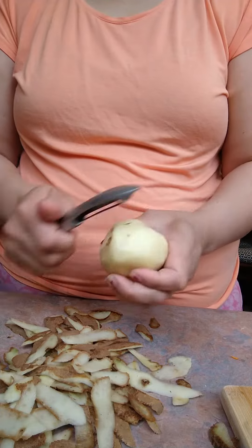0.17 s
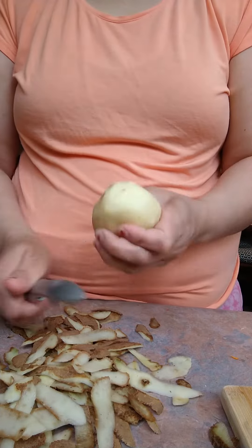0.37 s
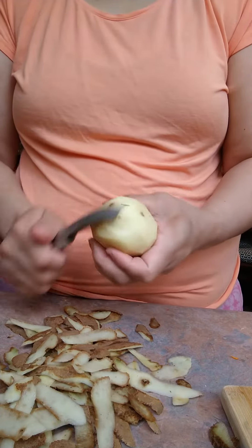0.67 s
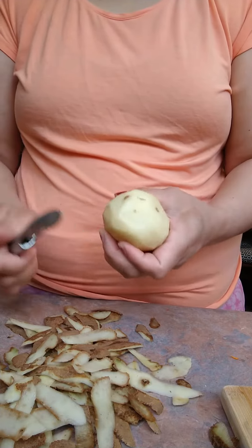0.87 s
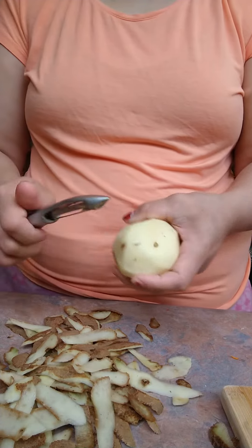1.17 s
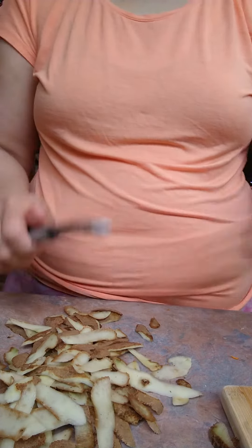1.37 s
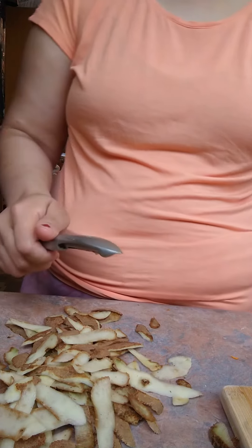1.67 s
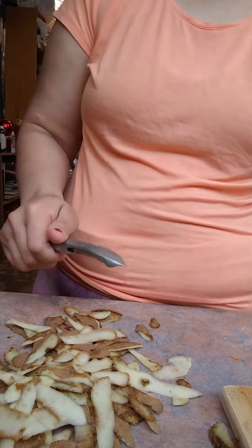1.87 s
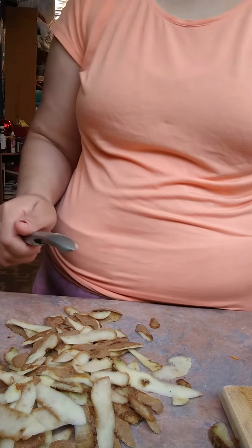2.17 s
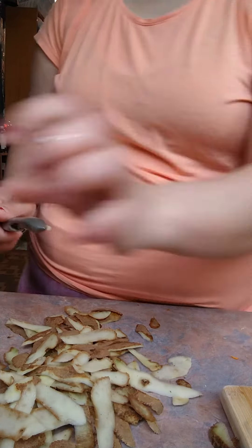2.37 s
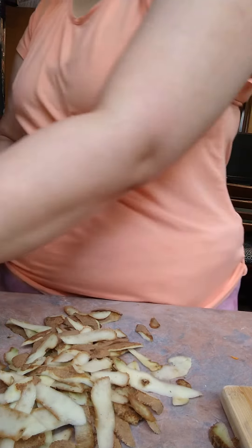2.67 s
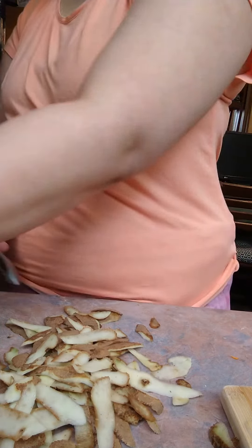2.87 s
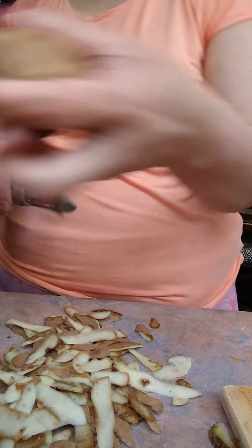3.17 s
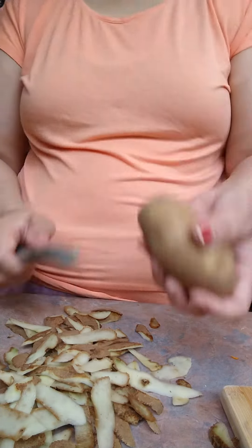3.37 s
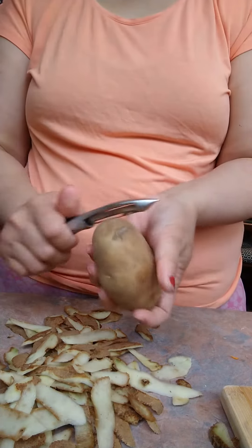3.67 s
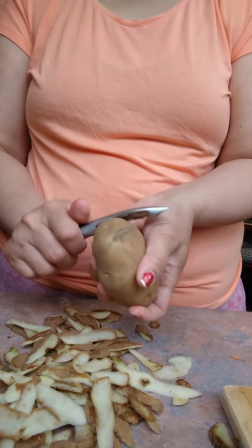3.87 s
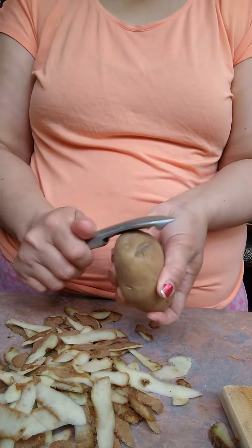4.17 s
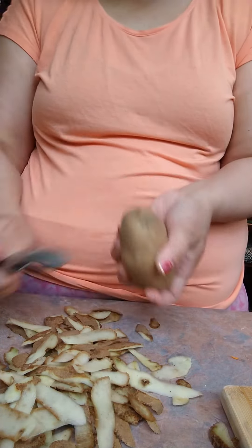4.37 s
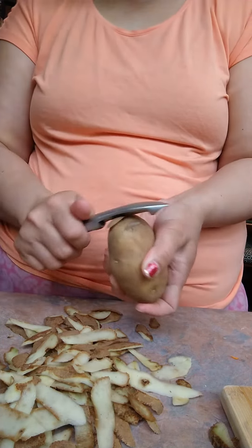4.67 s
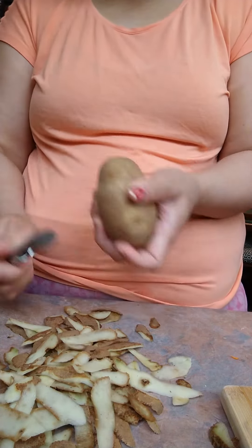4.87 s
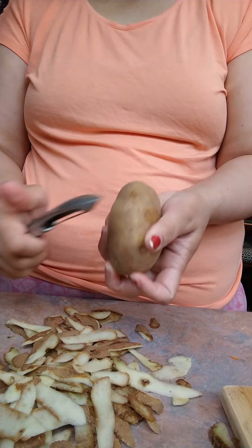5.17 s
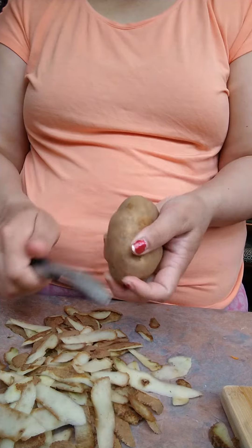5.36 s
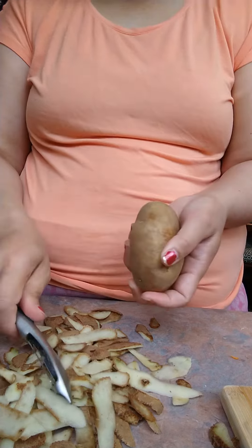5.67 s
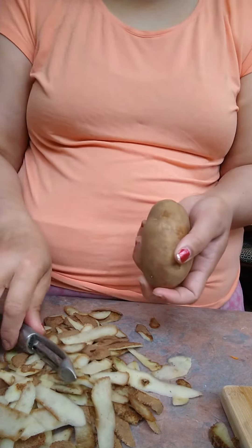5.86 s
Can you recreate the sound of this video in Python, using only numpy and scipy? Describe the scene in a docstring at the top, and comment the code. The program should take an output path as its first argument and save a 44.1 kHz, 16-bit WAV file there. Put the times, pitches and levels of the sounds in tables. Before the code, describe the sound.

A quiet room with soft low rumble, heard closely in stereo. From 0 to 0.85 s, a steel swivel peeler makes quick dry-bright scrapes on a raw potato, with crisp cracks at about 0.35 and 0.72 s and short tearing hiss. From 0.95 to 1.65 s the loose blade ticks and rattles lightly. At 2.1-2.4 s a hollow container booms in a cluster of dull thumps, with a brief low groan and a burst of rubbing; fainter rustling and sleeve movement continue, with a small knock at 2.73 s. Blade rattles at 3.3-3.5 s, then a sharp metallic bite near 3.87 s and scratchy strokes at 4.3, 4.7 and 4.85 s, with soft hand pats. Faint finger rubs follow around 5 and 5.7 s. At 5.94 s the peeler strikes the table loudly, bouncing three more times ever quicker and softer within 0.07 s, wood-like and briefly ringing, toward the left.

```python
"""A swivel peeler takes quick short strokes off a raw potato: random stick and slip drive its damped steel modes,
each bite is a burst of cracks, and skin tears in grains; off the potato the loose blade rattles and taps.
A hollow container booms, groans and rustles as the next potato is fetched, by blows on modes and friction grains.
Fingers, hands and sleeves are filtered grains and pats; at the end the peeler drops and bounces on the table,
whose modes ring. Shaped noise makes the soft room rumble."""
import sys
import numpy as np
from scipy import signal
from scipy.fft import rfft, irfft
from scipy.io import wavfile
from scipy.ndimage import uniform_filter1d

SR = 44100
rng = np.random.default_rng(int(sys.argv[2]) if len(sys.argv) > 2 else 0)


def to_wav(sig):
    """Store sig (one row per channel, or 1-D mono) as 16-bit WAV at the path in sys.argv[1].

    Samples outside -1..1 are clipped; the rate is SR.
    """
    pcm = np.clip(np.atleast_2d(sig), -1, 1) * 32767
    pcm = np.round(pcm).astype(np.int16)
    wavfile.write(sys.argv[1], SR, pcm.T)  # frames by channels


N = 265025
TIME = np.arange(N) / SR
SPAN = SR // 2  # samples given to one event
STEEL_SPAN = SPAN // 4  # samples of the blade's response
BLOW_S = 1 / 200  # a blow's level is its energy spread over this time

# Levels are relative, ahead of panning, filtering and mixing gains.
# blade pressed on the potato, juddering and squealing: (t/s, length/s, level/dB, squeal/dB)
SCRAPES = [(.007, 0.048, -44.5, -8), (0.176, 0.018, -57, -3), (0.411, 0.02, -47, -1.5),
           (.505, 0.0065, -60, 6), (0.711, 0.04, -52.5, 5), (0.799, 0.025, -50.5, -1),
           (4.316, 0.04, -50, 1), (4.389, .007, -45, 3), (4.83, 0.038, -39.5, 5)]
# blade off the potato, rattling in its handle: (t/s, length/s, level/dB)
RATTLES = [(1.133, 0.0086, -60.5), (1.322, 0.018, -51), (1.35, 0.01, -54), (1.3783, 0.0072, -49),
           (1.467, 0.034, -71), (1.508, 0.02, -67), (1.587, 0.017, -66), (3.327, 0.012, -56),
           (3.365, 0.027, -47.5), (3.533, 0.063, -69.5), (3.868, 0.011, -39.5), (4.678, .013, -41.5)]
# loose blade tapping its stops: (t/s, peak level/dB)
TAPS = [(.9616, -52), (1.0742, -56.5), (1.101, -57.5), (1.1565, -46.5), (1.1712, -52), (1.4932, -45.5),
        (1.6186, -41), (3.316, -46.5), (3.7673, -44.5)]
# edge snapping through skin: (t/s, level/dB)
BITES = [(0.34, -38), (0.7212, -36), (3.8722, -43.5), (4.296, -48.5), (4.4193, -52), (4.835, -48.5),
         (4.896, -69)]
# blade sliding under the skin: (t/s, length/s, level/dB, skew: under 1 peaks early, over 1 late)
SLICES = [(.344, 0.082, -59, 0.47), (.725, 0.13, -56, 0.23), (3.79, 0.086, -67.5, 0.73),
          (3.88, .06, -81, 0.21), (4.25, 0.08, -53.5, 1), (4.743, 0.089, -54.5, 1.26),
          (4.871, 0.41, -67, 0.12)]
# steel blade against the potato; t60 ahead of any wet damping: (f/Hz, level/dB, t60/s)
BLADE_MODES = [(1860, -18.5, 0.09), (2200, -22, 0.15), (4090, -21, 0.084), (5760, 2, 0.25),
               (7600, 1, 0.046), (7840, 6, 0.11), (7900, 3, 0.18), (9150, 3.5, 0.77), (10290, 10.5, 0.093),
               (11380, 0.5, 0.48), (11680, -15, 0.09), (11800, -22, 0.12), (12700, -6, 0.061)]
# blade swinging free in its handle, ahead of wet damping: (f/Hz, level/dB, t60/s)
LOOSE_MODES = [(4335, -3, 0.072), (4677, 5, 0.15), (4744, 10.5, 0.035), (4750, -32.5, 0.055)]
# blade squealing as it sticks in the flesh, ahead of wet damping: (f/Hz, level/dB, t60/s)
SQUEAL_MODES = [(4337, -10, 0.037), (5425, -17, 0.3), (10230, -7.5, 0.39), (15300, -1, 0.086),
                (15600, -23, 0.063)]
# potato in the hand: (f/Hz, level/dB, t60/s)
POTATO_MODES = [(320, -4, 0.074), (630, -4.5, 0.0033), (842, 6.5, 0.04), (1300, -42, 0.016),
                (2080, 0, 0.015)]
# spectra of contact grit, tearing skin and the bite's crack: (f/Hz, level/dB)
GRIT_COLOUR = [(500, -82), (1400, -31.5), (2100, 0), (3300, -7), (4300, 9), (6300, -4.5), (8000, 12.5),
               (9500, 0.5), (11000, 11.5), (13500, 1), (16000, -7.5)]
SKIN_COLOUR = [(300, -65), (800, 3.5), (1500, -12.5), (3000, 1), (4500, -2.5), (6000, -1.5), (8000, 2),
               (11000, -3.5), (16000, -4)]
SNAP_COLOUR = [(250, -39), (600, -1), (1500, -5), (2600, 1), (3400, 2), (4600, 4.5), (6200, -4.5),
               (8200, 5), (9700, -0.5), (11500, 7.5), (16000, -4)]
# blows on the container: (t/s, level/dB, contact time/s)
BUMPS = [(2.126, -34.5, 0.0045), (2.183, -30.5, 0.0028), (2.2006, -42, 0.001), (2.229, -36, 0.002)]
# container body: (f/Hz, level/dB, t60/s)
HOLLOW_MODES = [(138.4, -1.5, 0.19), (212, -1, 0.083), (257.5, 7, 0.49), (304.8, 3, 0.31), (435, -2, 0.32),
                (500, 4, 0.52), (993.5, -2, 0.29)]
# container dragging and groaning: (t/s, length/s, level/dB)
DRAGS = [(2.195, 0.22, -37.5), (2.43, 0.18, -51)]
# hand rummaging among the contents: (t/s, length/s, level/dB)
RUMMAGES = [(2.12, 0.14, -58), (2.26, 0.11, -60), (2.35, 0.061, -62), (2.4, 0.6, -68), (2.9, 0.82, -76.5)]
# things rubbing in the container: (f/Hz, level/dB)
RUMMAGE_COLOUR = [(200, -11.5), (470, -2.5), (720, -10), (1000, -6.5), (1300, -17), (1900, -18),
                  (2400, -7.5), (2750, -12.5), (3300, -17.5), (6000, -16), (8000, -31), (14000, -33),
                  (16000, -52)]
# container's rim, rung by the rubbing: (f/Hz, level/dB, t60/s)
RIM_MODES = [(2420, 5, 0.092), (2540, 4, 0.11), (2730, 7, 0.068), (5800, -27, 0.034)]
# a potato knocking on its neighbours: (t/s, level/dB)
NUDGES = [(2.717, -60), (2.7348, -46.5), (3.276, -65.5)]
# spectrum of those knocks: (f/Hz, level/dB)
NUDGE_COLOUR = [(80, 1), (240, 21), (450, 0), (900, 8.5), (1600, -12), (2600, 2), (5000, -9), (14000, -38)]
# peeler bouncing on the table: (t/s, level/dB, contact's low-pass corner f/Hz)
BOUNCES = [(5.938, -16.5, 6800), (5.9747, -19.5, 2730), (5.9944, -22.5, 1620), (6.0057, -28.5, 1750)]
# spectrum of the direct clack: (f/Hz, level/dB)
KNOCK_COLOUR = [(40, -60), (200, -20.5), (400, -6), (700, -1.5), (1100, 3), (1600, -7), (2200, -8),
                (3400, -21), (4800, -24), (6200, -30.5), (11000, -40.5), (16000, -42)]
# hollow handle: (f/Hz, level/dB, t60/s)
HANDLE_MODES = [(1210, -27, 0.07), (1670, 10, 0.019), (2730, -9, 0.0067), (4700, -8, 0.0069)]
# table top: (f/Hz, level/dB, t60/s)
TABLE_MODES = [(113, -13, 0.7), (162.5, -6, 0.14), (310, -3, 0.13), (463.4, -1.5, 0.56), (523, 3, 0.4),
               (728, 6, 0.085), (880, -8, 0.1), (865, -4, 0.088), (1000, -27, .14), (1190, -22, 0.077),
               (1666, 1, 0.038), (2100, -19, .14), (2470, -7.5, 0.32)]
# fingers rubbing over the potato: (t/s, length/s, level/dB, band centre f/Hz)
RUBS = [(2.794, 0.024, -66.5, 11500), (2.848, 0.039, -71.5, 10800), (2.915, 0.044, -66.5, 4800),
        (2.972, 0.059, -66, 7850), (4.005, 0.029, -60, 3300), (4.952, 0.22, -76, 4250),
        (5.064, 0.13, -70.5, 7940), (5.678, 0.068, -69, 4040)]
# fingers shifting the potato: (t/s, level/dB)
PATS = [(3.274, -55), (3.414, -57.5), (3.591, -58), (3.691, -59.5), (3.89, -59), (4.032, -62.5),
        (4.563, -65)]
# soft thud of the hand: (f/Hz, level/dB, t60/s)
PALM_MODES = [(258.7, 2.5, 0.28), (311, 2.5, 0.38), (511, -12.5, 0.3)]
# arms reaching and coming back, sleeves rustling: (t/s, length/s, level/dB)
REACHES = [(2.35, 0.83, -66), (3.05, 0.9, -71), (4.15, 0.99, -74)]
# spectrum of arms and cloth: (f/Hz, level/dB)
CLOTH_COLOUR = [(80, -12.5), (180, 1.0), (300, -4), (600, -37), (1500, -26.0), (5000, -27.5), (12000, -53.5)]
# spectrum of the wall reflections: (f/Hz, level/dB)
WALL_COLOUR = [(100, -6), (1000, 3.5), (5000, -1.0), (16000, -11.5)]
# spectrum of the room's background: (f/Hz, level/dB)
ROOM_COLOUR = [(15, -62.5), (25, -30), (97, 0), (180, -15), (242, -17.5), (301, -25.5), (354, -19.5),
               (384, -31), (516, -27), (818, -32), (1260, -33), (1940, -38.5), (2910, -40), (3250, -40),
               (16000, -49.5)]

# left minus right (dB)
SCRAPE_PAN_DB, RATTLE_PAN_DB, TAP_PAN_DB, BITE_PAN_DB = 2.5, .5, 3.5, 5
PRESSED_LOOSE_DB = -24  # pressure holds the swivel nearly still
FREE_SQUEAL_DB = -13
# gentler rattles ring more beside their grit: the loose modes' gain is 0 dB at this level
RATTLE_EVEN_DB, RING_DB_PER_DB = -50, 0.435
TAP_LOOSE_DB, TAP_DECAY_S = 1, 0.0017
# softer bites have more of the potato's body: its gain beside the crack is 0 dB at this level
BITE_EVEN_DB, BODY_DB_PER_DB = -63.5, 0.8
WET_DAMP_S = 0.035  # wet peel on the blade stops its ring within about this time
BEND_SHARE, BEND_RATE_HZ = 0.0074, 500  # the blade flexes, so its pitch wavers
# whistle of a scrape: gain at 0 dB squeal, and its change per dB of squeal (a stronger squeal has less)
WHISTLE_HZ, WHISTLE_DB, WHISTLE_DB_PER_DB = 15400, -16, -1
GROAN_HZ = 192
# the container's contents tumble at once, then settle
TUMBLE_S, TUMBLE_DB = 2.157, -40.5
TUMBLE_ATTACK_S, TUMBLE_HOLD_S, SETTLE_DB_PER_S = 0.011, 0.018, 300
RUMMAGE_SKEW, DRAG_SKEW, REACH_SKEW = 0.65, 0.61, 0.73
ROOM_DB, TOP_HZ = -63, 16000


def peeler():
    """Friction and fracture: stick and slip shake the blade, skin tears in grains, the potato answers each bite."""
    out, t = np.zeros((2, N)), TIME[:SPAN]
    for s, length, db, squeal_db in SCRAPES:
        force = slips(length, skew=0.42)
        whistle_ring = ring([(WHISTLE_HZ, 0, .02)], spread=.6, size=STEEL_SPAN)
        whistle = amp(WHISTLE_DB + WHISTLE_DB_PER_DB * squeal_db) * through(force, whistle_ring)
        scrape = steel(force, PRESSED_LOOSE_DB, squeal_db) + whistle
        add(out, s, amp(db) * pan(SCRAPE_PAN_DB) * scrape)
    for s, length, db in RATTLES:
        loose_db = RING_DB_PER_DB * (RATTLE_EVEN_DB - db)
        rattle = steel(slips(length, skew=0.59), loose_db, FREE_SQUEAL_DB)
        add(out, s, amp(db) * pan(RATTLE_PAN_DB) * rattle)
    for s, db in TAPS:
        impact = grains(rate=15000, scatter_db=1.5) * np.exp(-t / TAP_DECAY_S)
        tap = steel(impact, TAP_LOOSE_DB, FREE_SQUEAL_DB)
        add(out, s, amp(db) * pan(TAP_PAN_DB) * tap / np.abs(tap).max())
    for s, db in BITES:
        burst = unit(grains(rate=21000, scatter_db=9) * np.exp(-t / 0.004))
        crack = scatter(through(burst, colour(SNAP_COLOUR)))
        body = ring(POTATO_MODES, spread=0.23, vary_db=5.5, size=SPAN)
        body = amp(BODY_DB_PER_DB * (BITE_EVEN_DB - db)) * body
        add(out, s, blow(db) * pan(BITE_PAN_DB) * (crack + body))
    for s, length, db, skew in SLICES:
        tearing = grains(rate=4500, scatter_db=0) * swell(length, skew)
        hiss = scatter(through(tearing, colour(SKIN_COLOUR)))
        blade = amp(-15.5) * through(tearing, ring(BLADE_MODES, spread=.85, size=SPAN))
        add(out, s, amp(db) * (hiss + blade))
    return out


def slips(length, skew):
    """Stick-slip friction: contact force as a short run of sudden releases."""
    return unit(grains(rate=5000, scatter_db=6.5) * swell(length, skew)) * np.sqrt(length * SR / 2)


def steel(drive, loose_db, squeal_db):
    """Forced vibration: contact force excites grit and the blade's damped modes."""
    contact = dict(spread=.9, vary_db=2, detune=.003, size=STEEL_SPAN)
    blade = amp(-2) * ring(BLADE_MODES, bend=BEND_SHARE, **contact)
    loose = amp(loose_db) * pan(8.8) * ring(LOOSE_MODES, bend=BEND_SHARE, **contact)
    # sticking steadies the pitch
    squeal = amp(squeal_db) * ring(SQUEAL_MODES, bend=BEND_SHARE / 2, **contact)
    wet = np.exp(-(TIME[:STEEL_SPAN] / WET_DAMP_S) ** 2)
    grit = amp(2) * scatter(through(drive, colour(GRIT_COLOUR)))
    return through(drive, wet * (blade + loose + squeal)) + grit


def scatter(x):
    """Early reflection: hands and table scatter sound differently to each microphone, anew for each event."""
    return amp(-12.5) * x + amp(-2) * through(x, echoes(t60=0.0044, gap_s=0.00094))


def container():
    """Modal resonance and friction: blows boom in a hollow body; it groans while its contents rub and knock."""
    push, knocks = np.zeros((1, N)), np.zeros((2, N))
    for s, db, contact in BUMPS:
        pulse = swell(contact, skew=0.76)
        add(push, s, amp(db) * pulse / pulse.sum())
    boom = amp(35.5) * high_pass(through(push, ring(HOLLOW_MODES, spread=0.1)), 130)

    # the drag groans at one wavering pitch
    groan_hz = GROAN_HZ * (1 + 0.004 * wander(24))
    groan = np.sqrt(2) * np.sin(2 * np.pi * np.cumsum(groan_hz) / SR)
    groan = groan * moves(DRAGS, DRAG_SKEW) * amp(1.2 * wander(60))

    # each side has its own grains and a shared part
    rubs = np.array([grains(rate=2500, scatter_db=1, size=N) for _ in range(3)])
    effort = tumble() + moves(RUMMAGES, RUMMAGE_SKEW)
    rubs = (0.76 * rubs[:2] + 0.4 * rubs[2]) * effort * amp(2.5 * wander(70))
    rim = amp(-14.5) * through(rubs, ring(RIM_MODES, size=SPAN))
    rubbing = amp(-1.5) * through(rubs, colour(RUMMAGE_COLOUR)) + rim

    for s, db in NUDGES:
        add(knocks, s, blow(db) * colour(NUDGE_COLOUR))
    knocks = amp(-1.5) * knocks + through(knocks, echoes(t60=0.012, gap_s=0.0008))
    return boom + groan + pan(4.1) * rubbing + pan(6.6) * knocks


def tumble():
    """Dissipation: a quick rise, a short hold, and a steady fall in dB."""
    t = TIME - TUMBLE_S
    settling = np.maximum(t - TUMBLE_ATTACK_S - TUMBLE_HOLD_S, 0)
    return np.clip(t / TUMBLE_ATTACK_S, 0, 1) * amp(TUMBLE_DB - SETTLE_DB_PER_S * settling)


def table_knock():
    """Impact: the handle bounces ever quicker and softer near the left microphone; table and blade ring on."""
    blows = np.zeros((1, N))
    for s, db, hz in BOUNCES:
        contact = np.exp(-2 * np.pi * hz * TIME[:SPAN])
        add(blows, s, blow(db) * contact / contact.sum())
    clack = through(blows, colour(KNOCK_COLOUR))
    # bending waves carry the treble ahead of the bass: two all-pass stages
    warp = np.tan(np.pi * 1400 / SR)
    for _ in range(2):
        clack = signal.lfilter([warp - 1, warp + 1], [warp + 1, warp - 1], clack)
    handle = amp(-8) * through(blows, ring(HANDLE_MODES, spread=0.51, size=SPAN))
    near = amp(-5.5) * through(clack, echoes(t60=0.018, gap_s=0.0038))
    far = amp(-5.5) * through(clack, echoes(t60=0.25, gap_s=0.0054))
    top = amp(-4) * high_pass(through(blows, ring(TABLE_MODES, spread=0.25)), 82)
    jingle = amp(-33.5) * steel(blows[0], loose_db=2, squeal_db=0)
    return pan(12) * clack + pan(6) * (near + handle + jingle) + pan(3) * (top + far)


def fingers():
    """Sliding friction: skin on the potato gives a brief band of fine grains."""
    out = np.zeros((2, N))
    for s, length, db, hz in RUBS:
        band = colour([(hz / 8, -20), (hz / 1.75, -9), (hz, 0), (hz * 1.28, -9), (hz * 4, -20)])
        rub = grains(rate=8400, scatter_db=5) * swell(length, skew=0.5)
        add(out, s, amp(db) * scatter(through(rub, band)))
    return out


def hands():
    """Friction and soft impact: dull, uneven rustle of arms and cloth, and pats on the potato."""
    pats = np.zeros((2, N))
    for s, db in PATS:
        add(pats, s, blow(db) * ring(PALM_MODES, spread=0.06, size=SPAN))
    cloth = through(grains(rate=400, scatter_db=1.5, size=N), colour(CLOTH_COLOUR))
    rustle = amp(-0.5) * cloth * moves(REACHES, REACH_SKEW)
    return rustle + amp(2.5) * high_pass(pats, 150)


def room_tone():
    """Coherence: low rumble is alike in both microphones, the faint hiss above is not."""
    noise = rng.standard_normal((2, N + SPAN))
    shaped = through(noise, colour(ROOM_COLOUR, size=16384))[:, SPAN:]
    side = signal.sosfilt(signal.butter(1, 700, "high", fs=SR, output="sos"), shaped[1])
    return amp(ROOM_DB) * (shaped[0] + 0.89 * side * np.array([[1], [-1]]))


def ring(modes, spread=0, vary_db=0, detune=0, bend=0, size=SR):
    """Modal decay, energy 1 a channel: contact shifts the modes' shares and pitch, flexing bends them."""
    t, sides = TIME[:size], np.array([[1], [-1]])
    chance = rng.standard_normal((len(modes), 2))
    bent = t + bend * np.cumsum(wander(BEND_RATE_HZ, size)) / SR if bend else t
    out = 0
    for k, (hz, db, t60) in enumerate(modes):
        mode_hz = hz * (1 + detune * chance[k, 1])
        # phase between the microphones alternates from mode to mode
        phase = 2 * np.pi * mode_hz * bent + (-1) ** k * spread * sides
        decay = amp(db + vary_db * chance[k, 0] - 60 * t / t60) / np.sqrt(t60)
        out = out + decay * np.sin(phase)
    return unit(out)


def grains(rate, scatter_db, size=SPAN):
    """Random rupture: tiny events of uneven size, at a mean rate per second; rms 1."""
    hit = rng.random(size) < rate / SR
    sizes = amp(scatter_db * np.minimum(rng.exponential(size=size), 4))
    x = hit * rng.choice([-1, 1], size) * sizes
    return x / np.std(x)


def echoes(t60, gap_s):
    """Diffuse reflection: dense, unrelated left and right, building up after a gap."""
    t = TIME[:SPAN]
    build_up = 1 - np.exp(-(t / gap_s) ** 2)
    return unit(rng.standard_normal((2, SPAN)) * amp(-60 * t / t60) * build_up)


def colour(points, size=4096):
    """Minimum phase: causal impulse response of a (f/Hz, level/dB) spectrum, energy 1."""
    hz, db = np.transpose(points)
    f = np.maximum(np.fft.rfftfreq(size, 1 / SR), 1)
    cepstrum = irfft(np.log(amp(np.interp(np.log(f), np.log(hz), db))))
    # fold the cepstrum onto positive time
    cepstrum[1:size // 2] *= 2
    cepstrum[size // 2 + 1:] = 0
    return unit(irfft(np.exp(rfft(cepstrum))))


def through(x, response):
    """Linear superposition: convolve a sound with an impulse response."""
    return signal.fftconvolve(np.atleast_2d(x), np.atleast_2d(response), axes=-1)[:, :x.shape[-1]]


def high_pass(x, hz):
    """Radiation efficiency: small or thin bodies radiate little deep bass."""
    return signal.sosfilt(signal.butter(2, hz, "high", fs=SR, output="sos"), x)


def swell(length, skew):
    """Contact pressure: up and down over a stroke, peaking earlier for a skew under 1."""
    return np.sin(np.pi * np.minimum(TIME[:SPAN] / length, 1) ** skew).clip(0)


def moves(rows, skew):
    """Superposed effort: every (t/s, length/s, level/dB) movement swells and fades."""
    out = 0
    for s, length, db in rows:
        progress = np.clip((TIME - s) / length, 0, 1)
        out = out + amp(db) * np.sin(np.pi * progress ** skew)
    return out


def wander(rate, size=N):
    """Random fluctuation: continuous drift, spread near 1, with rate new targets per second."""
    k = int(SR / rate)
    steps = np.repeat(rng.standard_normal(size // k + 1), k)
    return 1.2 * uniform_filter1d(steps, k)[:size]


def amp(db):
    """Logarithmic level: decibels to gain."""
    return 10 ** (np.asarray(db) / 20)


def blow(db):
    """Impulse energy: gain of an energy-1 blow whose level is spread over BLOW_S."""
    return amp(db) * np.sqrt(BLOW_S * SR)


def unit(x):
    """Energy normalisation: scale to a mean energy of 1 a channel."""
    return x / np.sqrt(np.mean(np.sum(x ** 2, axis=-1)))


def pan(db):
    """Interaural level difference: left and right gains."""
    return amp(np.array([[db], [-db]]) / 2)


def add(out, s, x):
    """Superposition: mix a sound in at a time in seconds."""
    i = max(int(s * SR), 0)
    out[:, i:i + x.shape[-1]] += x[..., :max(N - i, 0)]


def scene():
    """Reverberation: walls answer the close sources; the table knock carries its own echoes."""
    close = peeler() + fingers() + container() + hands()
    walls = through(echoes(t60=0.28, gap_s=0.0017), colour(WALL_COLOUR))
    return close + amp(-14.5) * through(close, walls) + table_knock() + room_tone()


def record(dry):
    """Saturation and band limit: peaks are clipped at full scale, then the top is cut."""
    return signal.sosfilt(signal.ellip(8, .2, 70, TOP_HZ, fs=SR, output="sos"), np.clip(dry, -1, 1))


dry = scene()
out = record(dry)
to_wav(out)
```